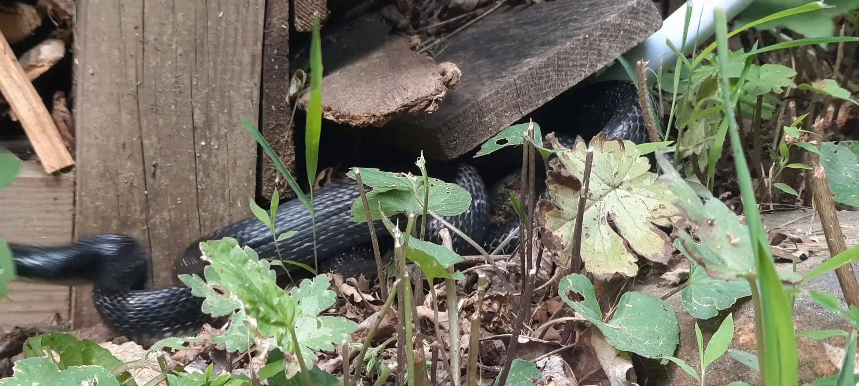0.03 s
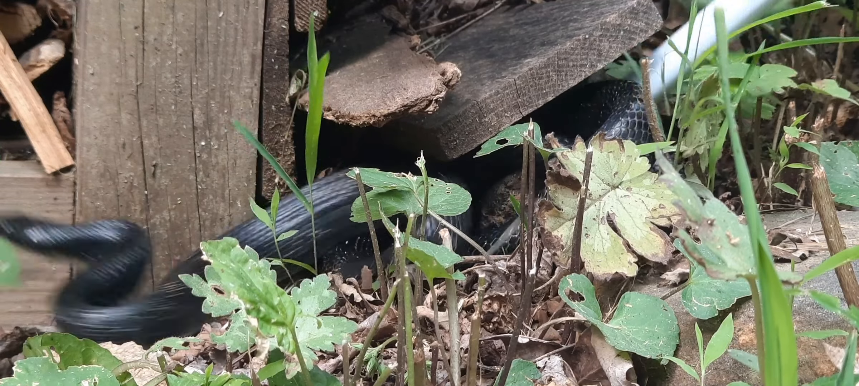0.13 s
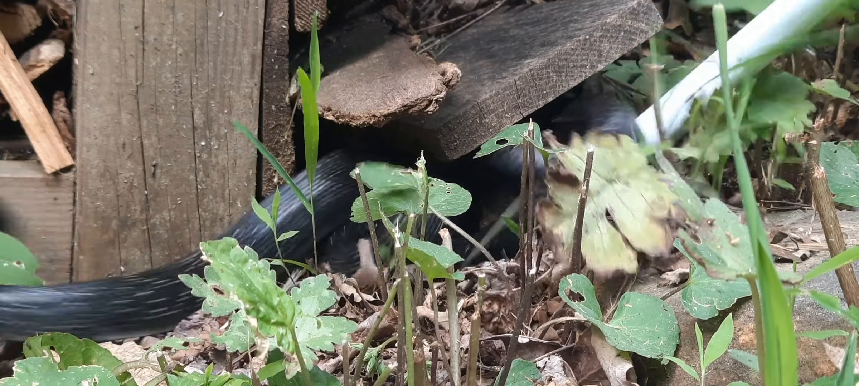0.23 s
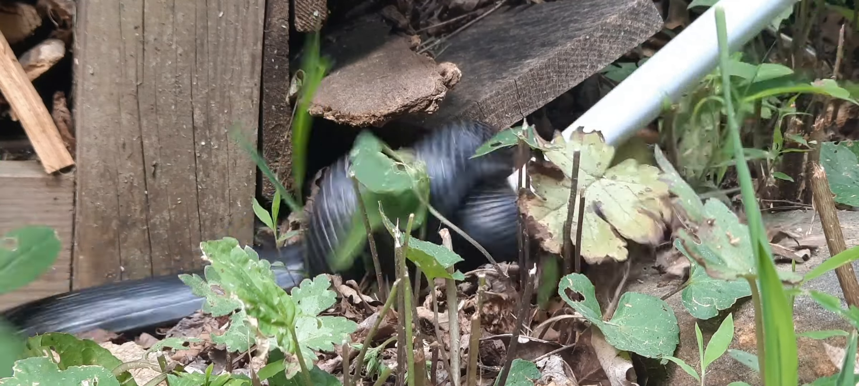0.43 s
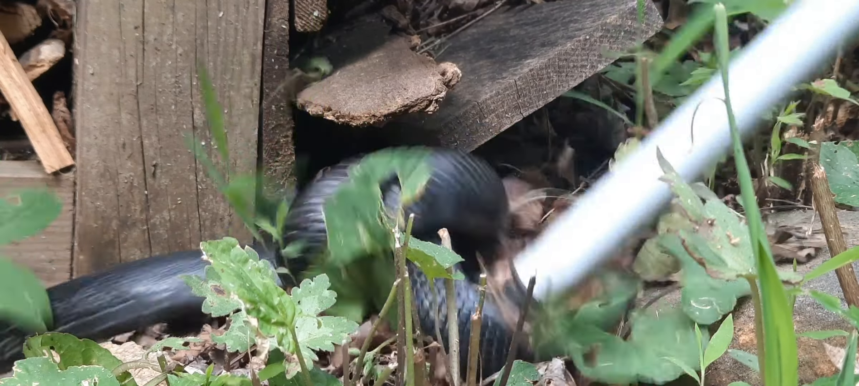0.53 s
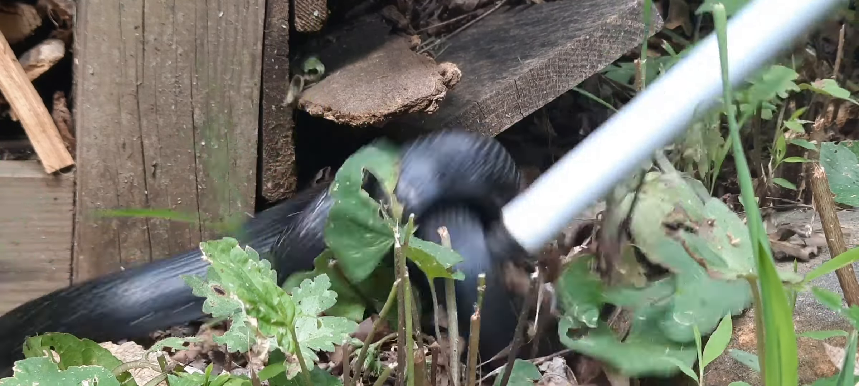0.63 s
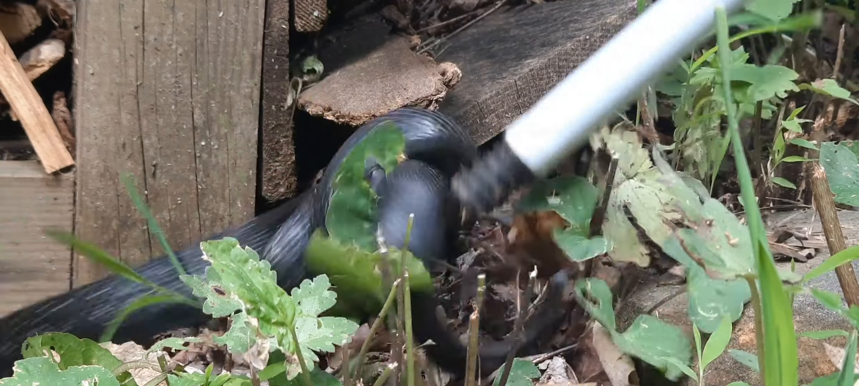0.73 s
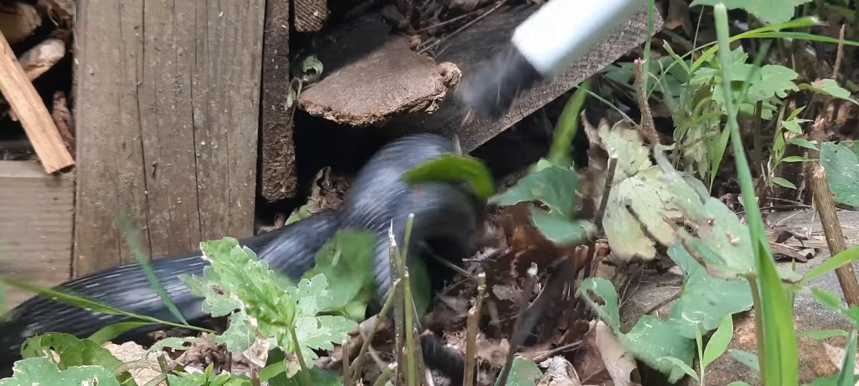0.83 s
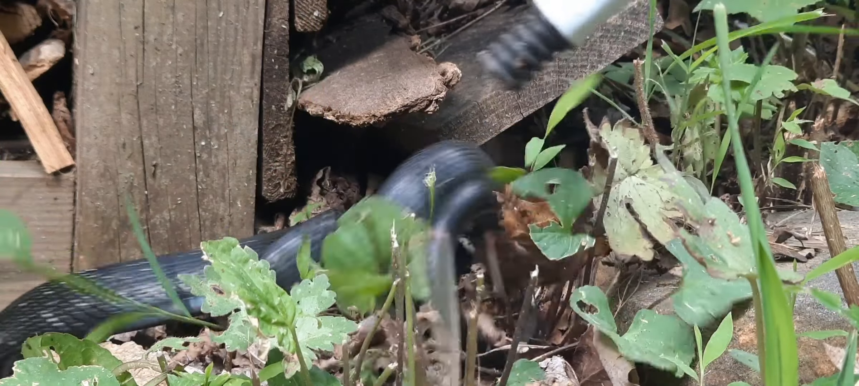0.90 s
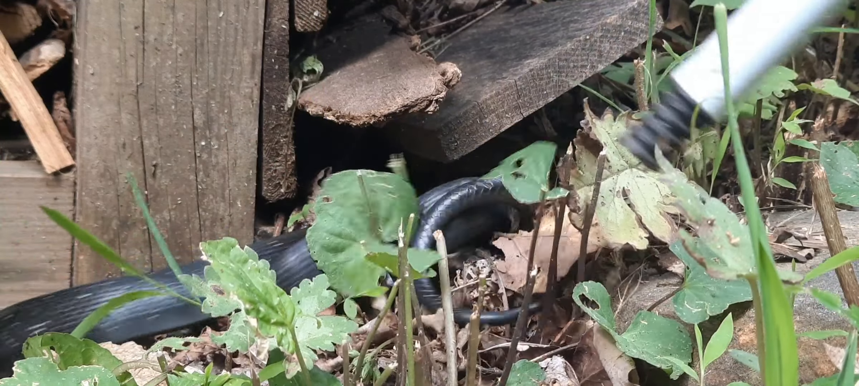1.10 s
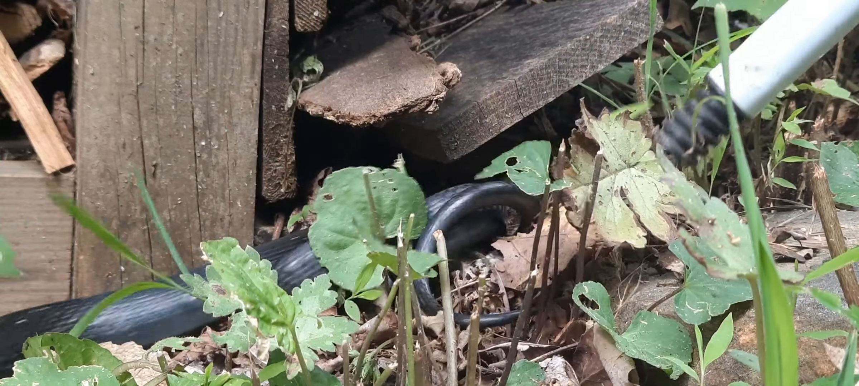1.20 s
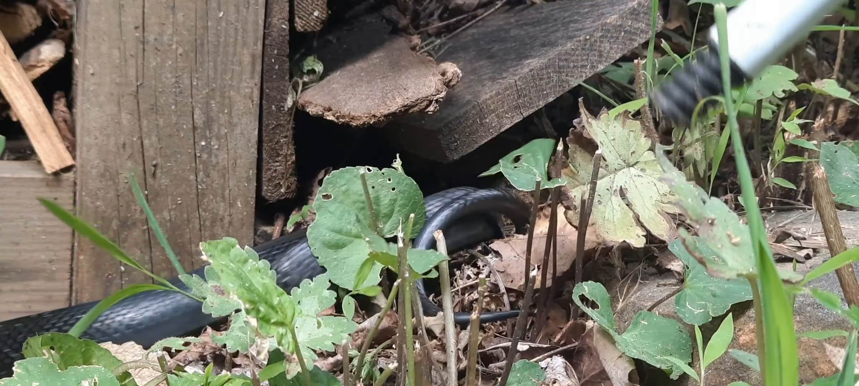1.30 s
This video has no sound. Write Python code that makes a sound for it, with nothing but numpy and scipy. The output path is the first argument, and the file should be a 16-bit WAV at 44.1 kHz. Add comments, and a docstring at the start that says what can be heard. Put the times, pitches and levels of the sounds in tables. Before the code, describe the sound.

Dry leaf litter rustles and crackles as a snake slides and a hollow pole stirs it; a tiny scrape, busy snapping bursts, then thinning rustle over faint outdoor rumble, close stereo microphone.

```python
"""Snake in dry leaf litter

Outdoors, a snake slides through dry leaves while a pole pokes beside it, heard by two small microphone ports.
Low outdoor rumble: patchy bands of noise, a little louder when the litter is stirred.
Pole: one short drag with a hollow scrape, a train of uneven slips ringing a tube.
Leaves: noise gated by dense short grains that swell with each stir; single leaves and stalks
snap as scattered clicks in the same bands."""
import sys
import numpy as np
from scipy import signal
from scipy.fft import rfft, irfft
from scipy.io import wavfile

SR = 44100
rng = np.random.default_rng(int(sys.argv[2]) if len(sys.argv) > 2 else 0)


def natural_amplitude(level_db):
    """Convert a level in decibels to a linear amplitude factor, elementwise."""
    exponent = np.asarray(level_db, float) / 20
    return 10 ** exponent


def materialize(psi):
    """Save the field psi as 16-bit PCM at rate SR to the path in sys.argv[1].

    A 1-D psi becomes a single channel; in a 2-D psi each row is a channel.
    """
    bounded = np.clip(np.atleast_2d(psi).T, -1, 1)
    quanta = np.round(bounded * 32767).astype(np.int16)
    wavfile.write(sys.argv[1], SR, quanta)


N = 59535  # samples, 1.35 s


def rms_one(x):
    """Scale to unit rms."""
    return x / np.sqrt(np.mean(x ** 2) + 1e-20)


def at_hz(points, hz):
    """Read a two-column table on a log-frequency axis."""
    table_hz, value = np.transpose(points)
    return np.interp(np.log(hz), np.log(table_hz), value)


def curves(rows):
    """Columns of a timed table, drawn as straight lines on the sample grid."""
    start_s, *columns = np.transpose(rows)
    return [np.interp(np.arange(N) / SR, start_s, column) for column in columns]


def drift(rate_hz):
    """Slow random wander of unit rms: noise through a two-pole low-pass, made at an eighth of the rate."""
    pole = np.exp(-2 * np.pi * rate_hz / (SR / 8))
    noise = rng.standard_normal(N // 8 + 4002)
    slow = signal.lfilter([1], [1, -2 * pole, pole * pole], noise)[4000:]  # without the run-in
    return np.interp(np.arange(N) / 8, np.arange(len(slow)), rms_one(slow))


def pair(alike):
    """Left and right white noise, alike to the given degree (0 to 1)."""
    mid, side = rng.standard_normal((2, N))
    alike = np.clip(alike, 0, 1)
    return np.sqrt((1 + alike) / 2) * mid + np.sqrt((1 - alike) / 2) * side * [[1], [-1]]


def band(x, low_hz, high_hz):
    """Band-pass."""
    return signal.sosfilt(signal.butter(2, [low_hz, high_hz], "band", fs=SR, output="sos"), x)


# colour of the outdoor rumble: frequency [Hz], density [relative dB per Hz]
RUMBLE_COLOUR = [(15, -43), (25, -19), (87, 0), (168, -6), (221, -11.5), (325, -11), (400, -3.5)]
# how alike the rumble is at the two ports: frequency [Hz], likeness [0 to 1]
RUMBLE_LIKENESS = [(30, 0.36), (70, 0.733), (150, 0.8)]
RUMBLE_DB, RUMBLE_PATCHY_DB, PATCHES_HZ = -67.5, 4, 4.32
RUMBLE_FOLLOWS = 0.333  # dB of rumble per dB of stirring


def rumble():
    """Low lumpy outdoor noise, each band wandering in level, a little louder when the ground is stirred."""
    out, edges_hz = 0, np.geomspace(25, 400, 9)
    for low_hz, high_hz in zip(edges_hz, edges_hz[1:]):
        centre_hz = np.sqrt(low_hz * high_hz)
        gain = natural_amplitude(at_hz(RUMBLE_COLOUR, centre_hz) + RUMBLE_PATCHY_DB * drift(PATCHES_HZ))
        noise = pair(at_hz(RUMBLE_LIKENESS, low_hz))
        out = out + gain * band(noise, low_hz, high_hz)
    stir_db = curves(STIR)[0]
    return natural_amplitude(RUMBLE_DB + RUMBLE_FOLLOWS * (stir_db - stir_db.mean())) * rms_one(out)


# resonances of the hollow pole: pitch [Hz], level [relative dB], time to die by 60 dB [s]
TUBE = [(175.7, 2, 0.0345), (334.6, 3.5, 0.0274), (397, 4, 0.037), (560, -11.5, 0.03)]
DRAG_START_S, DRAG_FULL_S, DRAG_END_S = 0.227, 0.23, 0.252  # slips grow until DRAG_FULL_S
DRAG_DB, DRAG_RISE_DB, WEAK_SLIP_DB = -46.5, 10, -4  # relative; every second slip is weaker
SLIPS_PER_S, SLIP_JITTER = 332, 0.149  # jitter as a share of the slip interval


def drag():
    """The pole sticks and slips unevenly, and each slip rings the tube's damped resonances."""
    steps_s = np.cumsum(1 + SLIP_JITTER * rng.standard_normal(40)) / SLIPS_PER_S
    slip_s = DRAG_END_S - steps_s + steps_s[0]  # counted back from the last slip
    slip_s = slip_s[slip_s > DRAG_START_S]
    weak_db = WEAK_SLIP_DB * (np.arange(len(slip_s)) % 2)
    missing = np.maximum(DRAG_FULL_S - slip_s, 0) / (DRAG_FULL_S - DRAG_START_S)
    slips, out = np.zeros(N), 0
    slips[(slip_s * SR).astype(int)] = natural_amplitude(DRAG_DB + weak_db - DRAG_RISE_DB * missing)
    for pitch_hz, level_db, t60_s in TUBE:
        pole, turn = natural_amplitude(-60 / (t60_s * SR)), 2 * np.pi * pitch_hz / SR
        resonator = [1, -2 * pole * np.cos(turn), pole * pole]
        out = out + natural_amplitude(level_db) * signal.lfilter([0, np.sin(turn)], resonator, slips + 1e-18)
    return band(out, 108, 1560)


GRAIN_S = 0.000356  # decay time constant of one grain


def dying(clicks, seconds):
    """Each click becomes an exponentially dying envelope."""
    return signal.lfilter([1], [1, -np.exp(-1 / (seconds * SR))], clicks + 1e-18)


def grains(per_s, spread_db):
    """Leaf contacts at random moments: an envelope of grains of widely spread size, rms 1."""
    size = natural_amplitude(spread_db * np.minimum(rng.exponential(1, N), 5))
    return rms_one(dying(size * (rng.random(N) < per_s / SR), GRAIN_S))


# snaps of single leaves and stalks: start [s], strength [relative dB], centre [Hz],
# left minus right [dB, on top of the lasting port balance], broad part [dB below or above the centre part]
SNAPS = [(0.0137, -31, 3020, 5.5, -12), (0.2134, -31.5, 5500, -3.5, -20.5), (0.0982, -25, 2500, -7.5, -17),
         (0.1585, -38, 14300, 2.5, 3.5), (0.1684, -25, 3050, -11, -14.5), (0.19, -30, 5240, -6, -17.5),
         (0.2013, -31.5, 6140, -4.5, -3), (0.2633, -27.5, 6565, 1, 1.5), (0.2742, -18, 6710, -8.5, -20),
         (0.2752, -13, 5400, -10.5, -18.5), (0.292, -17.5, 6070, 6, -0.5), (0.3084, -15.5, 6170, 9.5, -8.5),
         (0.3148, -24, 6520, -5, -6.5), (0.323, -26.5, 6480, -4, -15.5), (0.3409, -27.5, 6490, -5, -10),
         (0.4344, -13, 5780, -7, -8.5), (0.4593, -26.5, 6400, 1, -15), (0.4818, -8.5, 5810, -11.5, -10.5),
         (0.4857, -18, 13580, 17, -18), (0.484, -26.5, 1830, 3, -16.5), (0.4998, -20.5, 1960, 7.5, -12.5),
         (0.4955, -25, 620, -1.5, -9.5), (0.4973, -13.5, 6720, 2.5, -10), (0.5284, -17.5, 7240, 7.5, -5),
         (0.5503, -7.5, 5260, -4, -19.5), (0.5624, -8, 5750, 10, -11.5), (0.6436, -26, 6520, 0, 0.5),
         (0.6818, -20.5, 6524, -1, -10.5), (0.7046, -24, 2420, 6, -1.5), (0.7502, -17, 6050, 4, -9),
         (0.856, -22.5, 7500, -1.5, -7.5), (0.866, -18.5, 2300, 8.5, -17), (1.0724, -33, 800, -1, -5.5),
         (1.3084, -35.5, 12040, 0.5, -3.5)]
SNAP_DB, SNAP_OCTAVES = 5, 0.1785  # relative level; spread of the centre part
SNAP_DELAY_S, SNAP_S = .0009, 0.00016  # the bands of a snap are scattered over SNAP_S
PORT_SCATTER_S = .00008  # arrival spread of a snap between the ports
AFTER_S, AFTER_DB = .002, -5.5  # three weaker cracks follow each snap within AFTER_S


def snaps():
    """A function that adds every snap, with its later cracks, as clicks to the drive of one band."""
    start_s, snap_db, snap_hz, pan_db, broad_db = np.transpose(SNAPS)
    count, ports = len(start_s), [[0], [1]]
    after = (AFTER_S * SR * rng.random((count, 3)).T).astype(int)
    after_size = rng.uniform(-1, 1, (count, 3)).T  # either polarity
    level_db = snap_db + SNAP_DB + pan_db * np.array([[.5], [-.5]]) - at_hz(HEARD_COLOUR, snap_hz)

    def add_to(drive, hz):
        """Clicks, strongest in the bands near each snap's centre."""
        near = natural_amplitude(broad_db) + np.exp(-.5 * (np.log2(hz / snap_hz) / SNAP_OCTAVES) ** 2)
        scatter_s = SNAP_S * rng.random(count) + PORT_SCATTER_S * rng.random((count, 2)).T
        when = ((start_s + SNAP_DELAY_S + scatter_s) * SR).astype(int)
        size = natural_amplitude(level_db) * near
        drive[ports, when] += size
        for late, share in zip(after, after_size):
            drive[ports, when + late] += size * natural_amplitude(AFTER_DB) * share

    return add_to


# stirring of the litter: start [s], level [relative dB]
STIR = [(0.0,-56.5), (0.032,-62.5), (0.11,-58.5), (0.154,-52.5), (0.259,-47.5), (0.271,-38.5), (0.28,-36.5),
        (0.3,-41), (0.312,-37.5), (0.33,-46), (0.368,-50.5), (0.43,-47), (0.472,-43), (0.484,-34.5),
        (0.5,-33.5), (0.51,-36.5), (0.564,-37), (0.582,-40), (0.612,-36), (0.635,-38), (0.65,-35),
        (0.666,-41.5), (0.74,-44.5), (0.754,-40), (0.818,-49.5), (0.85,-46), (0.88,-48), (0.962,-48),
        (1.01,-56), (1.052,-49), (1.063,-49.5), (1.074,-46.5), (1.085,-51), (1.148,-51), (1.165,-54.5),
        (1.2,-56.5), (1.252,-61), (1.286,-55.5), (1.35,-60.5)]
# colour and side of the rustle: start [s], level below 700 Hz, from 700 to 2000 Hz, above 8 kHz [relative dB],
# left minus right below and above 8 kHz [dB, about its mean], likeness added below 4.5 kHz
SHADE = [(0.0,3,-1,-1.5,1,2.3,0.12), (0.066,-10.5,-4.5,-5.5,-2,2,0.16), (0.15,1,-6,-1.5,-1,1.85,0.33),
         (0.206,4,-1,-1.5,-2,1.9,0.033), (0.24,9.5,2.5,-4,1,2.2,0.16), (0.284,-7.5,-5.5,-0.5,-6,2.14,0.386),
         (0.33,0,-1,0.5,-2,1.8,0.069), (0.364,3.5,1.5,0,-2,1.9,-0.15), (0.446,3,1,1,-0.5,2.85,0.024),
         (0.484,1.5,4.5,3.5,-2.5,3.7,0.284), (0.53,-1.5,-1.5,3.5,-3,2.6,0.098),
         (0.586,4,1.5,0,-3.5,3.4,0.21), (0.646,-1.5,0.5,.5,-0.5,5.5,0.14),
         (0.71,7,1.5,2.5,-1.5,5.55,0.0057), (0.766,-0.5,1.5,1.5,-0.5,6.3,-0.015),
         (0.812,7,2.5,0,0.5,5.5,-0.081), (0.97,-1,1.5,2,-2.5,4.2,0.12), (1.07,1,2.5,3,-2.5,2.1,0.205),
         (1.172,-5,-1.5,0.5,-1,3.1,-0.028), (1.224,3,-1,1.5,-0.5,3.9,-0.012),
         (1.316,-2.5,1,2,-2,2.96,-0.079), (1.35,3,5,-1.5,-1,4.7,-0.011)]
# colour of the rustle and snaps as heard through the two microphone ports, which ring near 6 and 14 kHz:
# frequency [Hz], density [relative dB per Hz]
HEARD_COLOUR = [(150, -12), (217, -20.5), (320, -4), (367, -8), (541, -4.5), (1270, -8), (1880, -2.5),
                (2190, -2), (2660, 0), (4000, -2), (6020, 3), (6630, -8), (7310, -2.5), (9230, -15.5),
                (13600, -4), (15600, -0.5)]
# lasting balance of the two ports: frequency [Hz], left minus right [dB]
SIDES = [(150, -0.86), (400, 2), (700, 3), (1300, 3.5), (2200, 1), (3300, 2), (4500, 2), (6300, -11),
         (7600, 1), (9500, 15), (12000, 8.5), (15000, 1.5)]
# how alike the rustle is at the two ports: frequency [Hz], likeness [0 to 1]
LIKENESS = [(150, 1), (400, 0.786), (800, 0.53), (1500, 0.294), (3000, 0.496), (6000, 0.049), (15000, 0.07)]
GRAINS_PER_S, GRAIN_SPREAD_DB = 2500, 3.5  # crackle shared by all bands
SMALL_PER_S, SMALL_SPREAD_DB, SMALL_DB = 400, 1.5, -2  # grains heard in one band only
HISS_DB = -1  # smooth brushing under the grains
CLUMP_DB, CLUMPS_HZ = 0.44, 71  # clumping of the crackle
LEFT_LAG_S = -0.0000615  # negative: the litter lies a little nearer the left port


def litter():
    """Leaf contacts gate noise and snaps click, band by band, in the colour heard through the ports."""
    stir_db, = curves(STIR)
    low_db, mid_db, treble_db, side_db, treble_side_db, centred = curves(SHADE)
    tilts_db = low_db, mid_db, 0, treble_db
    broad, clumps = grains(GRAINS_PER_S, GRAIN_SPREAD_DB), natural_amplitude(CLUMP_DB * drift(CLUMPS_HZ))
    add_snaps = snaps()
    half = np.array([[.5], [-.5]])  # shares a left-minus-right level between the ports
    out, edges_hz = 0, np.geomspace(150, 19000, 29)
    for low_hz, high_hz in zip(edges_hz, edges_hz[1:]):
        hz = np.sqrt(low_hz * high_hz)
        tilt_db = tilts_db[np.searchsorted([700, 2000, 8000], hz)]
        sway_db = treble_side_db if hz > 8000 else side_db
        small = natural_amplitude(SMALL_DB) * grains(SMALL_PER_S, SMALL_SPREAD_DB)
        gate = np.sqrt(natural_amplitude(2 * HISS_DB) + broad ** 2 + small ** 2)  # powers add
        noise = pair(at_hz(LIKENESS, hz) + centred * (hz < 4500))
        drive = natural_amplitude(stir_db + tilt_db + half * (sway_db - sway_db.mean())) * clumps * gate * noise
        add_snaps(drive, hz)
        colour = natural_amplitude(at_hz(HEARD_COLOUR, hz) + at_hz(SIDES, hz) * half)
        out = out + colour * band(drive, low_hz, high_hz)
    lag = np.exp(-2j * np.pi * np.fft.rfftfreq(N, 1 / SR) * LEFT_LAG_S)
    left = irfft(rfft(out[0]) * lag, N)
    return natural_amplitude(5) * np.array([left, out[1]])


def scene():
    """Rumble, pole and litter together at the two ports; the pole is equal in both."""
    return rumble() + drag() + litter()


def roll_off(x):
    """The treble ends steeply here."""
    return signal.sosfilt(signal.butter(12, 16250, fs=SR, output="sos"), x)


def record(dry):
    """A steep low-pass removes the top, 60 dB down from 15.98 kHz."""
    finished = signal.sosfilt(signal.cheby2(24, 60, 15980, fs=SR, output="sos"), dry)
    return roll_off(finished)


dry = scene()
out = record(dry)
materialize(out)
```